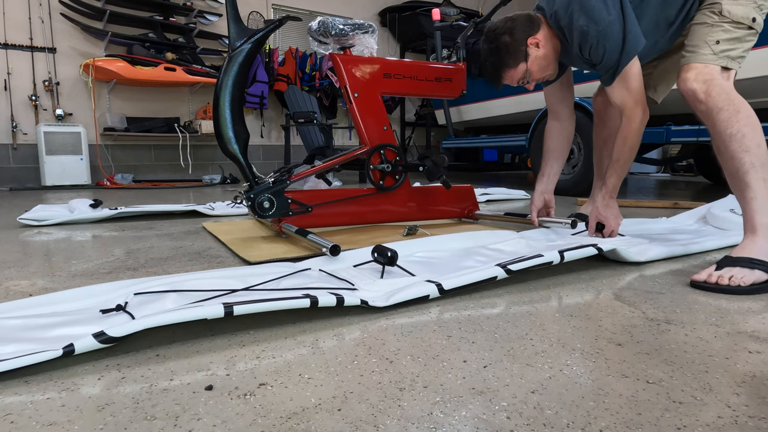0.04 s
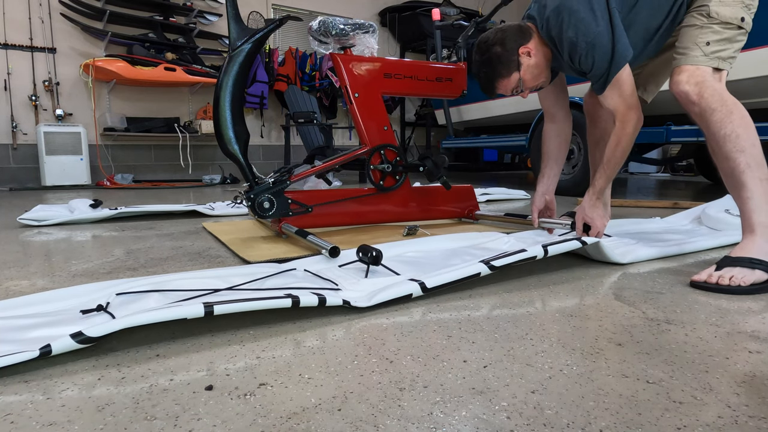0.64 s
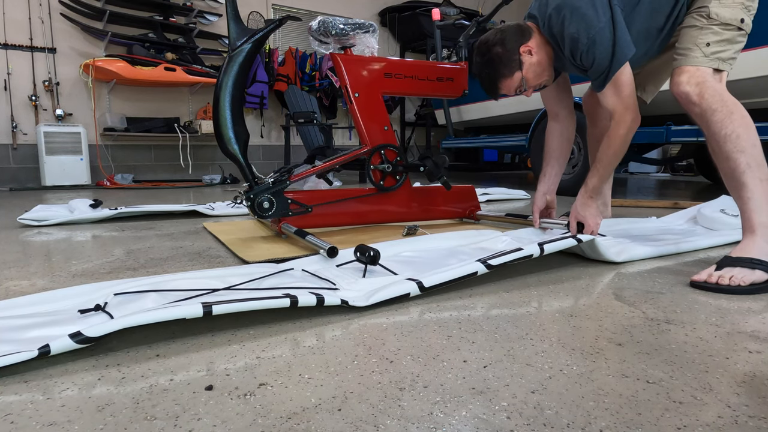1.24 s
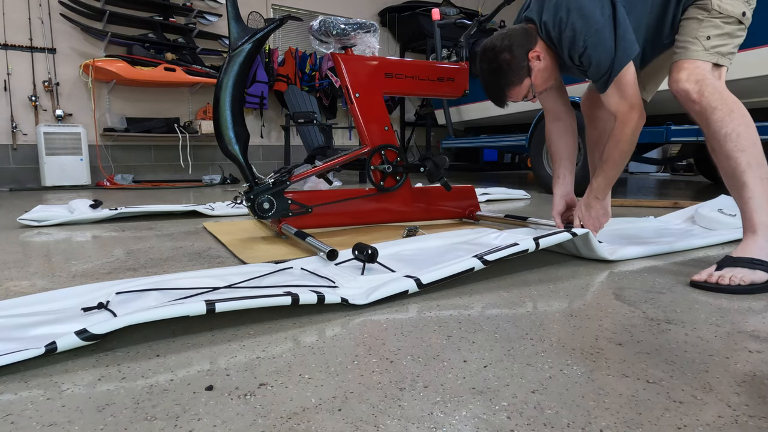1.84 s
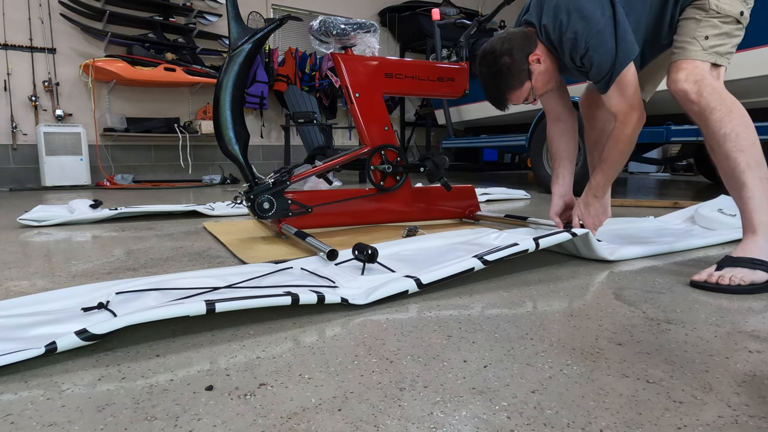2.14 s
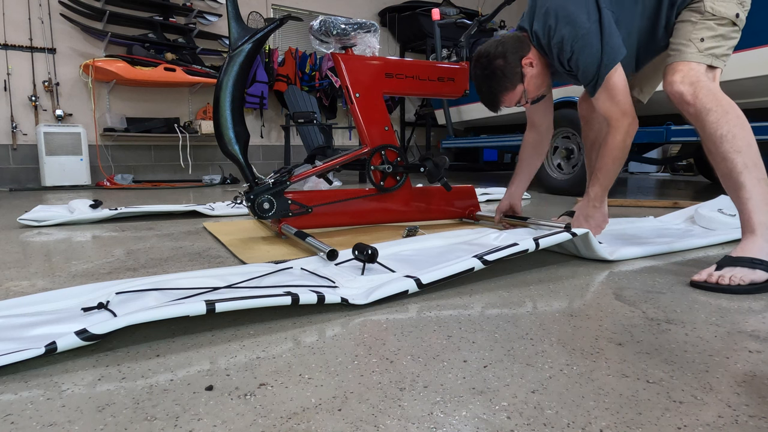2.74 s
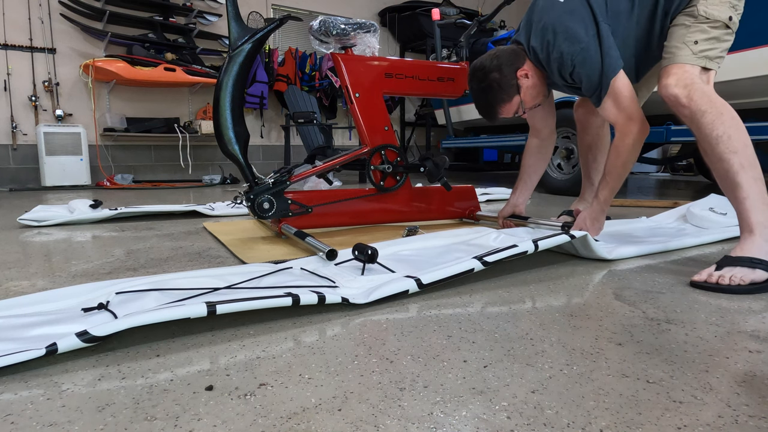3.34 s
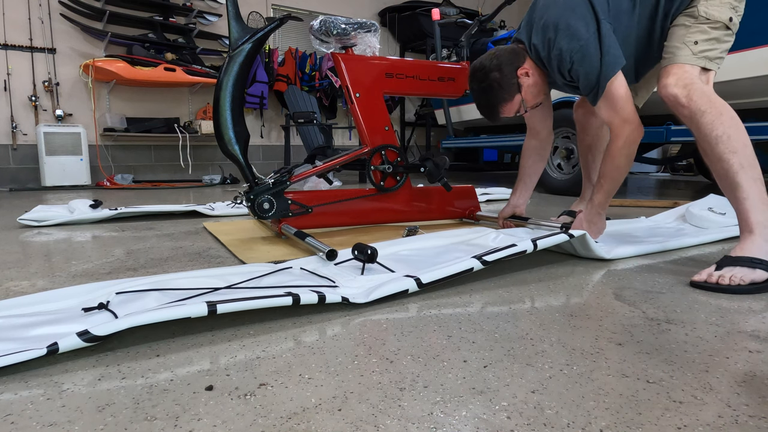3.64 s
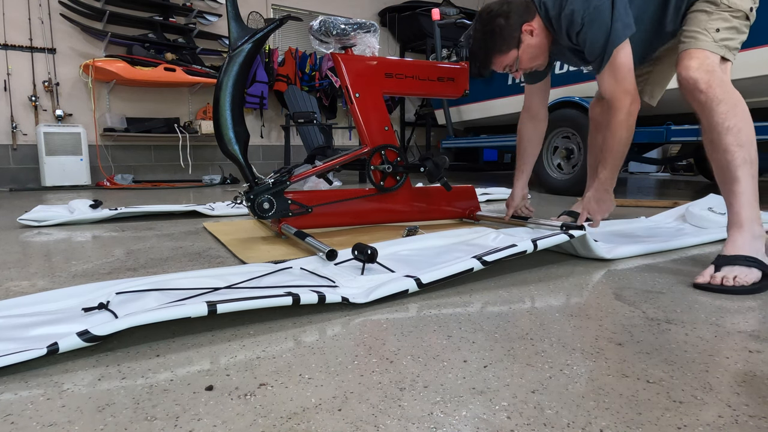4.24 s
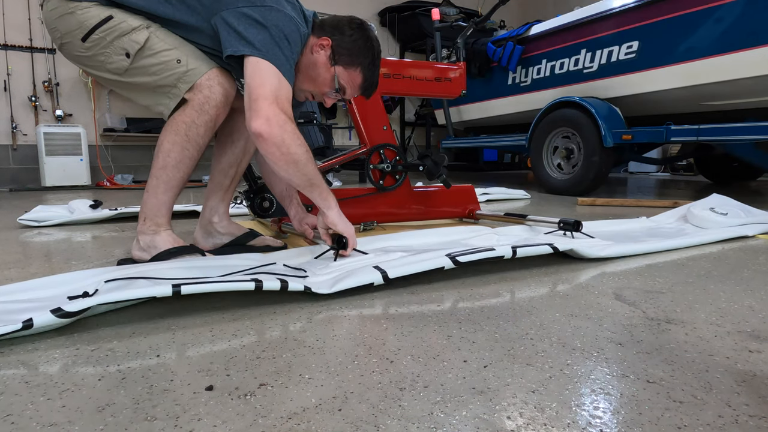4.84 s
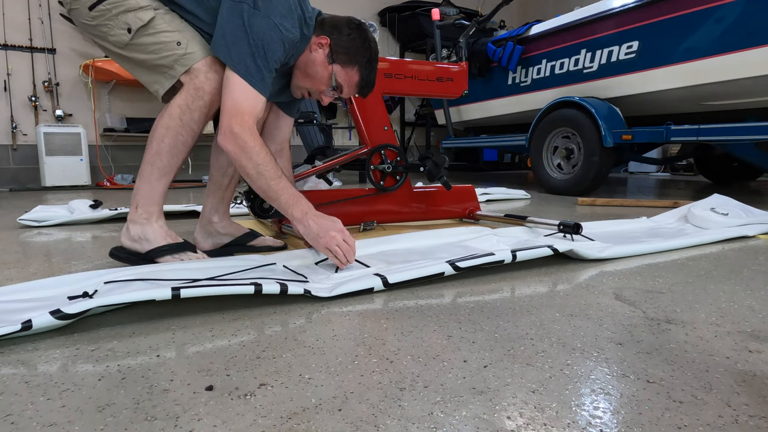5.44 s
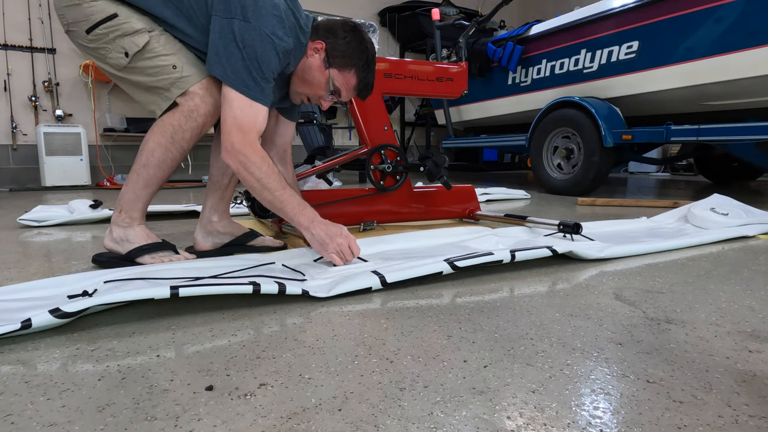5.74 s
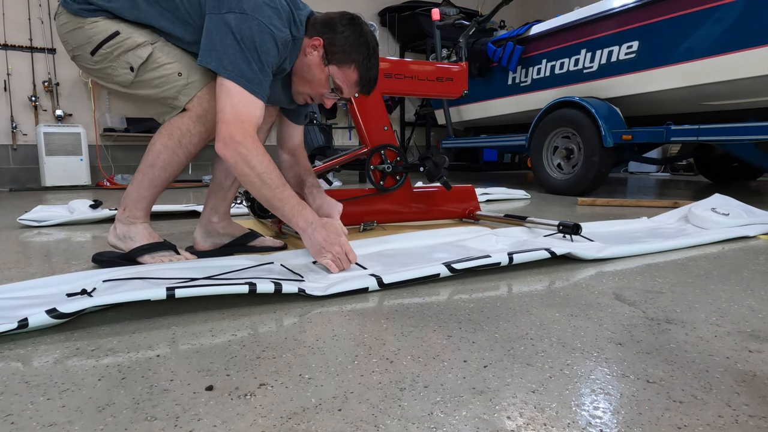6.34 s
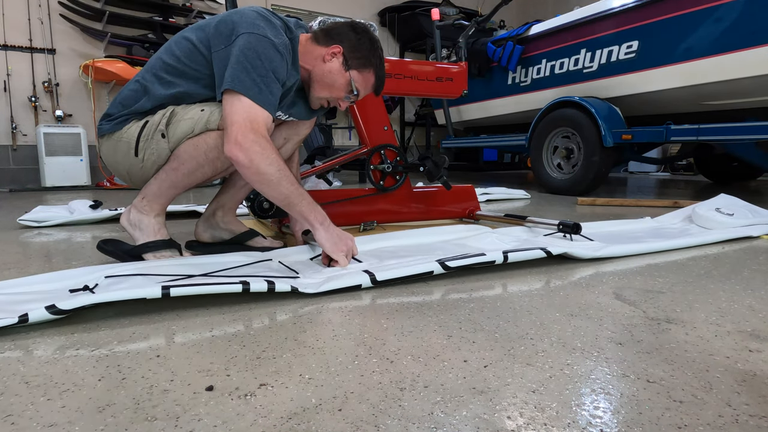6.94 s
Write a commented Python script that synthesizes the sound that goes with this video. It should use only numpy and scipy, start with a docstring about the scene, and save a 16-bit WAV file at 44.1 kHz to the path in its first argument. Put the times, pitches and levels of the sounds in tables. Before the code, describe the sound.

Irregular hollow thuds, a clinking metal strut and snapping buckles as a deflated pontoon is fitted in a garage.

```python
"""Fitting a pedal boat's pontoon

A limp vinyl pontoon is worked onto the metal struts of a pedal boat on a garage floor.
The hollow frame knocks and rings, the strut clinks and scrapes, and buckles snap close by.
The fabric rustles, squeaks and swishes under hands and sandals; hard walls answer everything."""
import sys
import numpy as np
from scipy import signal
from scipy.fft import rfft, irfft, next_fast_len
from scipy.io import wavfile

SR = 44100
rng = np.random.default_rng(int(sys.argv[2]) if len(sys.argv) > 2 else 0)


def log_audio(samples):
    """Write samples as a 16-bit WAV file to the path given in sys.argv[1]."""
    # one column per channel
    frames = np.atleast_2d(samples).T
    # limit to full scale, then quantise
    limited = np.clip(frames, -1, 1)
    pcm = np.round(limited * 32767).astype(np.int16)
    wavfile.write(sys.argv[1], SR, pcm)


N = 313138
TIME = np.arange(N) / SR

# The frame's lingering ring, set off by blows and by the strut: pitch_hz, width_hz, gain_db
FRAME_RING = [(332, 10, 1), (548, 12.4, 9.5), (724, 99, 1.5), (750, 13, -7.5), (1110, 12, -0.5),
              (1342, 3.3, 13.5), (1690, 5.9, -7), (1850, 15, 15)]


def from_db(db):
    """Decibels to gain."""
    return 10 ** (np.asarray(db) / 20)


def at_hz(points, hz):
    """Read a curve on a log-frequency axis."""
    points_hz, values = np.transpose(points)
    return np.interp(np.log(np.maximum(hz, 1)), np.log(points_hz), values)


def unit_energy(x):
    """Scale so that the squares sum to one."""
    return x / np.sqrt(np.sum(x ** 2) + 1e-20)


def at_level(x, db):
    """Give a short sound the energy of 10 ms at this level."""
    return unit_energy(x) * from_db(db) * np.sqrt(SR / 100)


def add(track, start_s, sound):
    """Mix a sound into the track."""
    start = max(int(start_s * SR), 0)
    track[start:start + len(sound)] += sound[:max(N - start, 0)]


def colour(x, eq):
    """Minimum-phase EQ, so nothing rings ahead of an attack."""
    size = 2 * next_fast_len(len(x) // 2 + 1024)
    gain = from_db(at_hz(eq, np.fft.rfftfreq(size, 1 / SR)))
    cepstrum = irfft(np.log(gain))
    cepstrum[1:size // 2] *= 2
    cepstrum[size // 2 + 1:] = 0
    return irfft(rfft(x, size) * np.exp(rfft(cepstrum)))[:len(x)]


def resonate(x, modes):
    """Parallel resonances, each with its own peak gain."""
    out = 0
    for pitch_hz, width_hz, gain_db in modes:
        radius = np.exp(-np.pi * width_hz / SR)
        poles = [1, -2 * radius * np.cos(2 * np.pi * pitch_hz / SR), radius ** 2]
        ring = signal.lfilter([1, 0, -1], poles, x + 1e-18)
        out = out + from_db(gain_db) * (1 - radius ** 2) / 2 * ring
    return out


def band(x, low_hz, high_hz):
    """Gentle band-pass."""
    return signal.sosfilt(signal.butter(2, [low_hz, high_hz], "band", fs=SR, output="sos"), x + 1e-18)


def grit(size, grain_db, max_steps):
    """Noise of uneven grains, like countless tiny slips."""
    return rng.standard_normal(size) * from_db(grain_db * np.minimum(rng.exponential(1, size), max_steps))


def texture(eq, grain_db):
    """A steady bed of coloured grit at rms 1."""
    return unit_energy(colour(grit(N, grain_db, max_steps=6), eq)) * np.sqrt(N)


def contact(decay_s, impact, rise_s=.0003, size=12000):
    """Force of one touch: chatter swells and dies, with an impact that stands out if the touch is brief."""
    t = np.arange(size) / SR
    chatter = grit(size, grain_db=2.5, max_steps=5)
    force = unit_energy(chatter * np.exp(-t / decay_s) * (1 - np.exp(-t / rise_s)))
    force[int(rise_s * SR)] += impact * min(1, 0.004 / decay_s)
    return force


def room_air():
    """Faint, dark room tone."""
    # Tone of the air: frequency_hz, gain_db
    air_eq = [(20, 1.5), (45, 3), (95, -10.5), (180, 4), (290, -4), (555, -6), (865, -18.5), (1310, -11.5),
              (2480, -20), (6910, -28), (12000, -41), (15000, -69)]
    return from_db(-56.5) * texture(air_eq, grain_db=2.5)


def garage_tail(size=48000):
    """Dense wall echoes; each octave dies at its own rate."""
    # Reverb time, before the limits below: frequency_hz, t60_s
    reverb_times = [(100, 0.7), (400, 0.71), (1500, 0.66), (4000, 0.78), (8000, 0.45), (14000, -1.1)]
    # Tone of the echoes: frequency_hz, gain_db
    echo_eq = [(100, -1), (400, -4), (1500, 1.5), (4000, -3.5), (8000, -3.5), (14000, -14.5)]
    t, hz = np.arange(size) / SR, np.fft.rfftfreq(size, 1 / SR)
    white, tail = rfft(rng.standard_normal(size)), 0
    build_up = np.clip((t - .003) / 0.0025, 0, 1)
    for centre_hz in 62.5 * 2.0 ** np.arange(9):
        octave = np.maximum(1 - np.abs(np.log2((hz + 1) / centre_hz)), 0)
        t60_s = np.clip(at_hz(reverb_times, centre_hz), .25, 1.3)
        envelope = unit_energy(build_up * np.exp(-np.log(1000) * t / t60_s))
        tail = tail + irfft(white * octave) * envelope * from_db(at_hz(echo_eq, centre_hz))
    return tail


def garage(send):
    """The work moves from spot to spot, each with its own pattern of echoes."""
    # Boundaries of the stays at each spot: time_s
    spots = [0, .8, 1.6, 2.3, 3.4, 4.3, 4.85, 5.4, 5.82, 6.2, 7.2]
    out = np.zeros(N)
    for start_s, end_s in zip(spots, spots[1:]):
        add(out, start_s, signal.fftconvolve(send[int(start_s * SR):int(end_s * SR)], garage_tail()))
    return out


def stroke(start_s, length_s, attack_s=0.065, release_s=0.041):
    """Envelope of one pull: the hand gathers speed, holds, and the fabric settles."""
    attack = np.clip((TIME - start_s) / attack_s, 0, 1)
    return attack * np.exp(-np.clip((TIME - start_s - length_s) / release_s, 0, 20))


def fabric(creases_per_s=44):
    """Folds rumple low and the surface hisses; each crease that flips gives a crinkle and a small bump."""
    # Pulls that drag and fold the fabric: start_s, length_s, rumple_db, hiss_db
    strokes = [(-0.08, 0.16, -58.5, -49.5), (0.201, 0.31, -44, -41), (0.497, 0.12, -64, -59),
               (0.763, 0.1, -38, -47), (1.874, 0.13, -49.5, -80), (2.784, 0.34, -76, -50.5),
               (2.89, 0.38, -50, -57), (3.167, .12, -51.5, -46), (4.14, .18, -79, -53.5),
               (5.154, 0.17, -56.5, -64), (5.402, 0.36, -53, -55.5), (5.856, 0.16, -41, -42.5),
               (6.053, 0.37, -46.5, -60), (6.706, 0.13, -57.5, -61.5), (7.003, 0.066, -43, -37)]
    # Low body of the folds: frequency_hz, gain_db
    rumple_eq = [(70, -25), (160, -0.5), (400, 5), (650, 1), (950, -0.5), (1500, -6), (2000, -20),
                 (3000, -40)]
    # Bright rub of the surface: frequency_hz, gain_db
    hiss_eq = [(700, -18), (1300, 2), (2200, -1), (3200, -1), (5000, -4), (7200, -8), (8800, -16.5),
               (11000, -15.5), (15000, -33)]
    rumple, hiss = from_db(-63), from_db(-75)  # stirring under the hands between strokes
    for start_s, length_s, rumple_db, hiss_db in strokes:
        pull = stroke(start_s, length_s)
        rumple = np.hypot(rumple, from_db(rumple_db) * pull)
        hiss = np.hypot(hiss, from_db(hiss_db) * pull)
    flips = (rng.random(N) < creases_per_s / SR) * rng.uniform(-0.99, 1, N)
    creases = signal.fftconvolve(flips, contact(decay_s=.0012, impact=.4))[:N]
    crinkle, bumps = (unit_energy(colour(creases, eq)) * np.sqrt(N) for eq in (hiss_eq, rumple_eq))
    surface = texture(hiss_eq, grain_db=3.0) + from_db(-4.5) * crinkle
    folds = texture(rumple_eq, grain_db=3.5) + from_db(-5.5) * bumps
    return from_db(-1) * rumple * folds + from_db(-5) * hiss * surface


def swishes():
    """Fast, smooth slides over taut vinyl speed up and slow to a stop."""
    # Slides: start_s, rise_s, length_s, peak_db
    slides = [(5.491, 0.084, 0.16, -25.5), (5.824, 0.024, 0.18, -32)]
    # Tone of rubbed vinyl: frequency_hz, gain_db
    vinyl_eq = [(200, -22), (700, -3), (1400, 3.5), (2500, 1.5), (4500, 1), (7500, -3), (8800, -11),
                (10500, -9.5), (12500, -13.5), (15500, -39)]
    level = 0
    for start_s, rise_s, length_s, peak_db in slides:
        speed = np.interp(TIME - start_s, [0, rise_s, length_s], [0, 1, 0])
        level = level + from_db(peak_db) * speed ** 0.76
    return level * texture(vinyl_eq, grain_db=3.0)


def squeaks():
    """Vinyl sticks and slips rapidly, keeping one resonance going."""
    # Squeaky rubs: start_s, level_db, pitch_hz, width_hz, decay_s
    rubs = [(.434, -35, 3000, 910, 0.012), (6.262, -41.5, 1890, 50, 0.016), (6.445, -56, 1890, 30, 0.014),
            (6.497, -51, 1895, 50, 0.0066), (6.575, -59, 1885, 30.8, 0.0086)]
    out = np.zeros(N)
    for start_s, level_db, pitch_hz, width_hz, decay_s in rubs:
        slips = band(contact(decay_s, impact=0), pitch_hz / 1.64, pitch_hz * 2.0)
        add(out, start_s, at_level(resonate(slips, [(pitch_hz, width_hz, 0)]), level_db))
    return out


def thumps():
    """Soft, heavy landings carry only bass."""
    # Weight meeting the floor: start_s, level_db
    landings = [(4.533, -40), (4.921, -43), (6.024, -32)]
    out = np.zeros(N)
    for start_s, level_db in landings:
        force = contact(decay_s=0.029, impact=0.52)
        add(out, start_s, at_level(band(force, 18, 106), level_db))
    return out


def snaps():
    """Short dry cracks led by one sharp impact, duller where the contact is soft."""
    # Buckles and vinyl snapping close by: start_s, level_db, high_cut_hz, decay_s
    cracks = [(.783, -39, 6660, .002), (1.015, -44.5, 3400, 0.0015), (1.121, -58, 7000, .004),
              (1.252, -28, 5060, 0.00086), (3.069, -47.5, 9900, 0.0066), (4.075, -55, 5000, 0.0022),
              (4.92, -28.5, 8800, 0.0013), (5.516, -32.5, 10100, 0.0019), (5.784, -29, 7060, 0.003),
              (5.842, -26.5, 13100, 0.0056), (6.055, -31.5, 4040, 0.0015), (6.24, -49, 5970, 0.0027),
              (6.732, -53.5, 5800, 0.01)]
    # Tone of a snap: frequency_hz, gain_db
    snap_eq = [(300, -2.5), (1100, 5.5), (2500, 1.5), (5500, 4.5), (8500, -1.5), (11000, -1),
               (15000, -21.5)]
    out = np.zeros(N)
    for start_s, level_db, high_cut_hz, decay_s in cracks:
        crack = colour(contact(decay_s, impact=.55, rise_s=.0001), snap_eq)
        add(out, start_s, at_level(band(crack, 210, high_cut_hz), level_db))
    return out


def strut():
    """Metal chatters along the tube, which rings and passes the shaking on to the frame."""
    # Clinks and scrapes: start_s, level_db, decay_s, rise_s, ring_send_db
    clinks = [(1.574, -42.5, 0.017, 0.0015, -35), (1.612, -51.5, 0.16, .003, 3.5),
              (1.68, -34, 0.027, 0.017, -16), (1.73, -30, 0.024, 0.00076, -1),
              (1.957, -39, 0.0055, 0.00024, -4.5), (3.541, -22.5, 0.05, 0.00069, -4),
              (3.562, -20, 0.02, .004, -4), (3.605, -22.5, 0.046, 0.0065, -30),
              (3.97, -51, 0.024, 0.00088, -10)]
    # Tone of metal on metal: frequency_hz, gain_db
    metal_eq = [(300, -3.5), (900, -1), (1800, 1), (3000, -1.5), (4300, 2), (6500, -4), (8800, -13),
                (10600, -19.5), (13000, -15), (15500, -60)]
    # The tube's ring: pitch_hz, width_hz, gain_db
    tube_modes = [(2540, 29, 7), (3030, 51, 7.3), (3836, 80.5, 8.7), (3950, 83, 11.3), (4130, 90, 5.9),
                  (4350, 44, 6.6), (4750, 45, 4.3), (4915, 37, 8.7), (5170, 40, 4.5), (6250, 80, 8.8),
                  (7700, 200, 6), (10380, 480, 18.6), (11800, 99, 10.5)]
    scrape, ring_send = np.zeros(N), np.zeros(N)
    for start_s, level_db, decay_s, rise_s, ring_send_db in clinks:
        touch = at_level(colour(contact(decay_s, impact=0.029, rise_s=rise_s), metal_eq), level_db)
        add(scrape, start_s, touch)
        add(ring_send, start_s, touch * from_db(ring_send_db))
    frame_ring = from_db(-7) * resonate(scrape, FRAME_RING)
    return from_db(1.0) * (scrape + resonate(ring_send, tube_modes) + frame_ring)


def blow(hardness_db, knock_hz, decay_s, rise_s, thud_db):
    """A crack at the contact, then frame and floor answer; hardness and thud are relative to the knock."""
    # Hollow knock of the frame: pitch_hz, width_hz, gain_db
    knock_modes = [(299, 180, 8), (382, 340, 0.5), (512, 176, -4), (696, 68, 0.5)]
    # Plastic clack of its walls: pitch_hz, width_hz, gain_db
    clack_modes = [(973, 180, 3.5), (1190, 56, 4), (1330, 160, 7), (1502, 140, 1.5), (1690, 115, 0),
                   (1970, 160, -6)]
    # Bright edge of the contact: frequency_hz, gain_db
    edge_eq = [(1600, -22), (2300, 0.5), (3100, 4), (4500, 1.5), (6800, -4), (8500, -15.5), (11000, -17.5),
               (15000, -30.5)]
    push = contact(decay_s, impact=1.98, rise_s=rise_s)
    rattle = contact(decay_s, impact=0.051, rise_s=rise_s)
    thud = at_level(band(push, 136, 223), thud_db)
    boom = at_level(band(push, 90, 132), thud_db - 11)
    knock = at_level(band(resonate(push, knock_modes), knock_hz / 1.55, knock_hz * 1.41), 0)
    # The thin walls radiate over only about an octave; two passes steepen its edges.
    walls = band(band(resonate(rattle, clack_modes), 930, 2020), 930, 2020)
    clack = at_level(walls, hardness_db)
    edge = at_level(colour(rattle, edge_eq), -4 + 1.37 * hardness_db)  # grows faster than the clack
    lag = int(0.0008 * SR)
    return np.pad(clack + edge, (0, lag)) + np.pad(thud + boom + knock, (lag, 0))


def frame():
    """Sharp blows and soft flops both set the hollow frame ringing."""
    # Blows on the frame: start_s, level_db, hardness_db, knock_hz, decay_s
    blows = [(0.175, -38, -14.5, 430, 0.0079), (0.482, -35.5, -5, 460, .003),
             (0.651, -37, -14, 457, 0.0047), (0.665, -43, -7, 450, 0.0022), (0.817, -18, -4.5, 490, 0.023),
             (0.881, -25.5, -21, 453, 0.0079), (0.984, -29, -13, 467, 0.014),
             (1.227, -26.5, -0.5, 503, 0.041), (1.731, -31.5, -5.5, 550, 0.018),
             (1.992, -37.5, -6.5, 506, 0.014), (2.336, -39.5, 7, 480, 0.046),
             (2.347, -21, -15.5, 577, 0.0077), (2.43, -34.5, -7.5, 515, 0.0097),
             (2.51, -36.5, -14, 643, 0.0078), (3.52, -42, -2, 500, 0.011), (3.562, -30.5, 5, 645, 0.02),
             (3.969, -43, -4, 697, 0.012), (4.459, -29.5, -3.5, 722, 0.023), (4.519, -26, -4, 580, 0.011),
             (4.532, -18.5, -7.5, 507, 0.0062), (4.59, -41.5, 2.5, 490, .013),
             (4.905, -22.5, -4, 420, 0.0046), (4.919, -20, -21, 377, 0.0048),
             (4.943, -23.5, -11, 320, 0.009), (5.258, -35, -13.5, 416, 0.0065),
             (5.842, -16, -13.5, 414, .0035), (6.006, -32, -23, 480, 0.011),
             (6.026, -28.5, -13.5, 490, 0.0021), (7.034, -38.5, 3, 453, 0.009)]
    # The limp pontoon flopping on the floor: start_s, level_db
    flops = [(3.087, -42), (4.446, -40), (5.631, -36.5), (6.185, -36.5), (6.268, -38.5), (6.496, -46.5),
             (6.791, -42.5)]
    hits = np.zeros(N)
    for start_s, level_db, hardness_db, knock_hz, decay_s in blows:
        hit = blow(hardness_db, knock_hz, decay_s, rise_s=0.00173, thud_db=-9.5)
        add(hits, start_s, from_db(level_db) * hit)
    for start_s, level_db in flops:
        flop = blow(hardness_db=-11.5, knock_hz=430, decay_s=0.012, rise_s=.0035, thud_db=0.5)
        add(hits, start_s, from_db(level_db) * flop)
    return from_db(-1.5) * (hits + from_db(-11) * resonate(hits, FRAME_RING))


def scene():
    """Direct sound sits near the middle; echoes and room air spread to the sides."""
    # Stereo width: frequency_hz, side_gain_db
    width_eq = [(40, -15), (150, -16), (500, -12.5), (1000, -8), (2000, -6), (4000, -5.5), (8000, -11.5),
                (13000, 1)]
    far = frame() + thumps() + strut() + squeaks() + fabric()
    near = snaps() + swishes()
    send = far + from_db(-5.0) * near
    mid_air, side_air = room_air(), room_air()
    mid = far + near + garage(send) + mid_air
    # The highest treble leans left, the rest slightly right.
    lean = from_db(-12) * band(mid, 10000, 15700) - from_db(-31.5) * mid
    side = colour(garage(send) + side_air + from_db(-11.5) * near, width_eq) + lean
    return np.array([mid + side, mid - side])


def record(dry):
    """A steep high cut at 15.3 kHz."""
    return signal.sosfilt(signal.ellip(10, .2, 80, 15300, fs=SR, output="sos"), dry)


dry = scene()
out = record(dry)
log_audio(out)
```